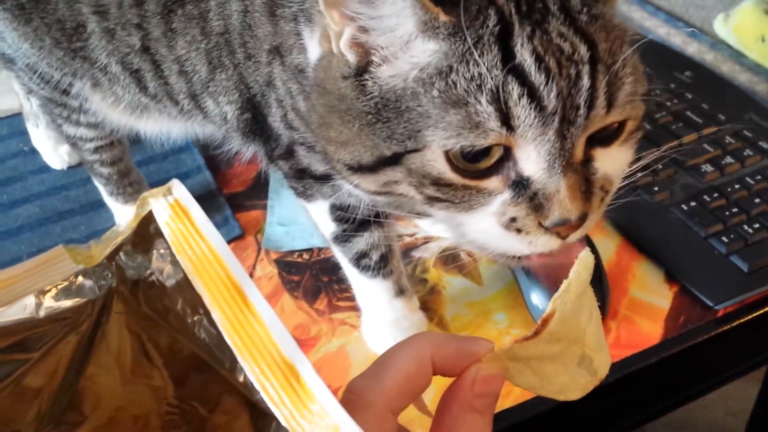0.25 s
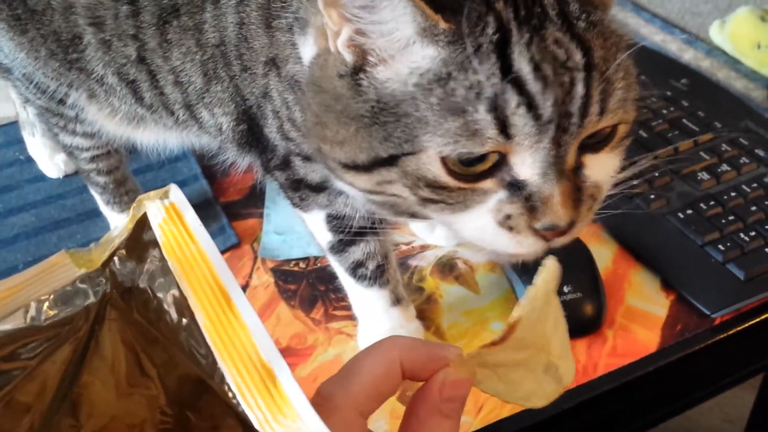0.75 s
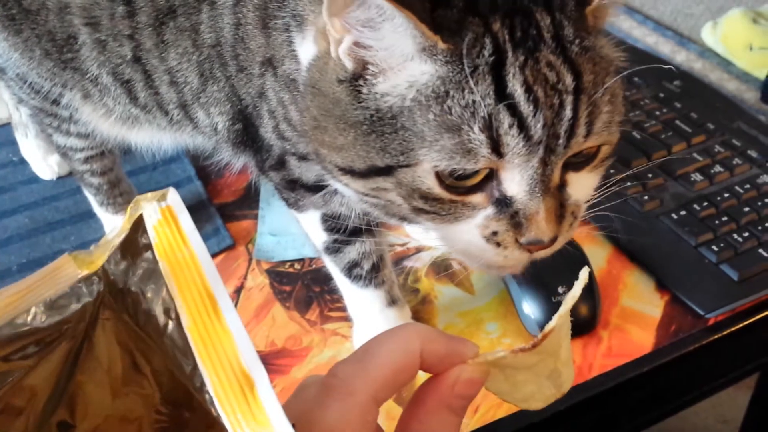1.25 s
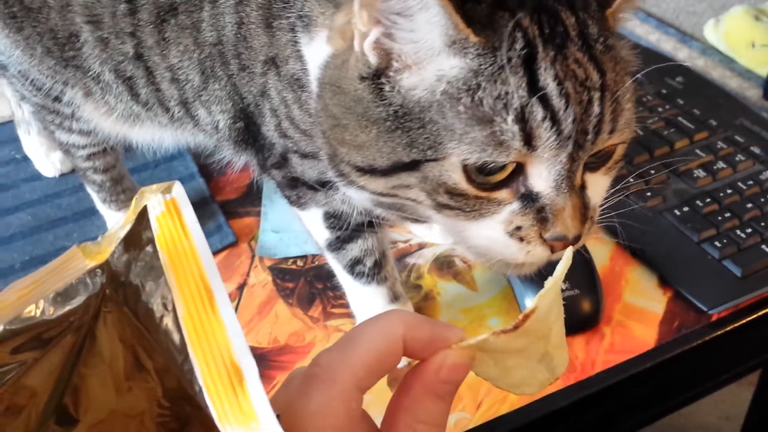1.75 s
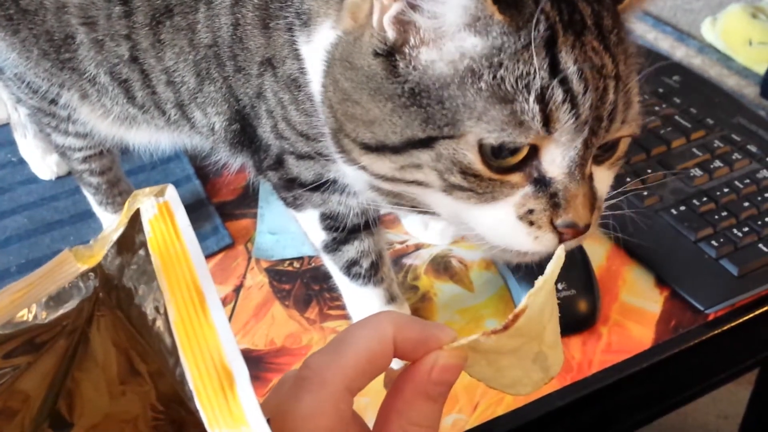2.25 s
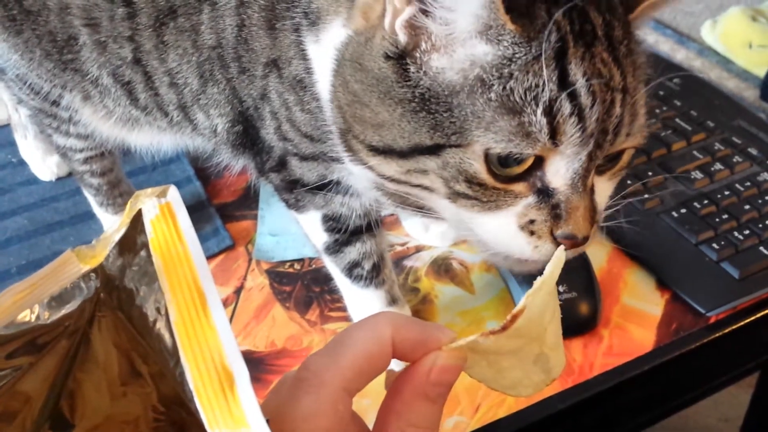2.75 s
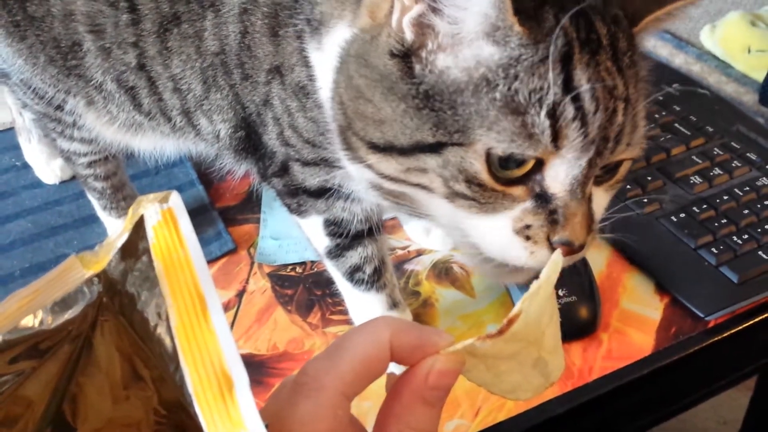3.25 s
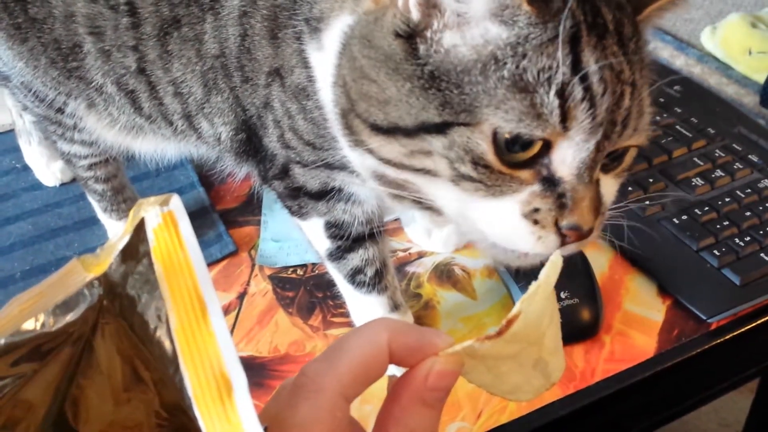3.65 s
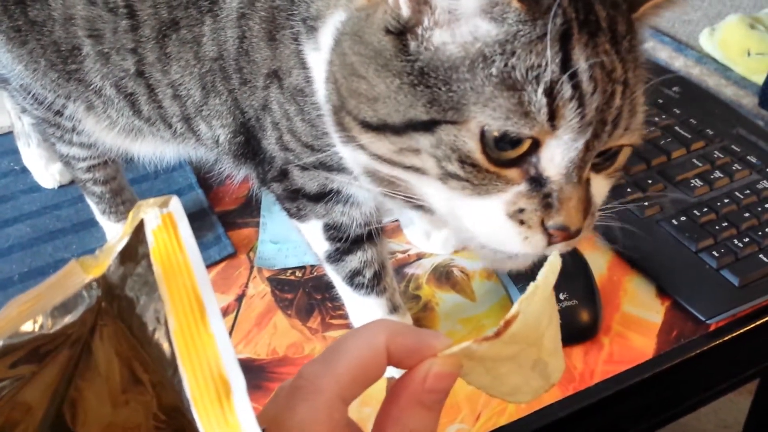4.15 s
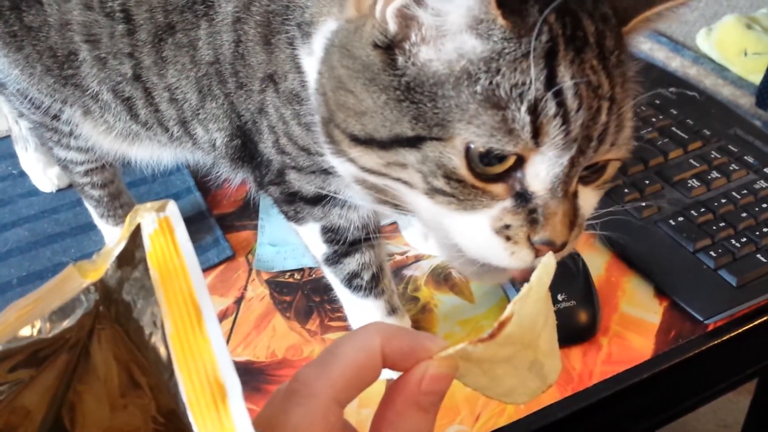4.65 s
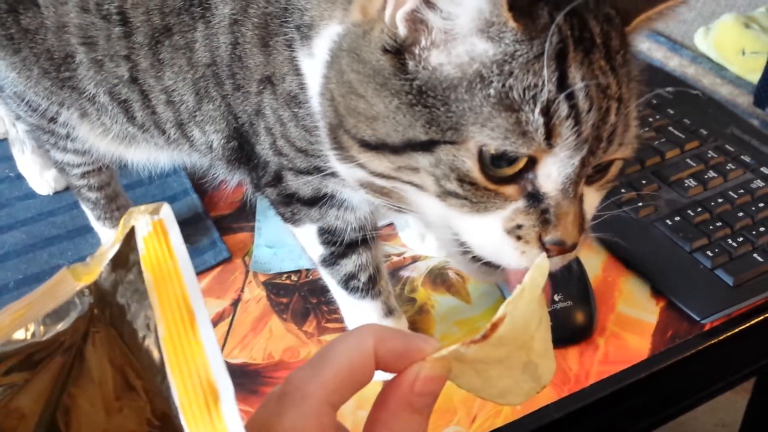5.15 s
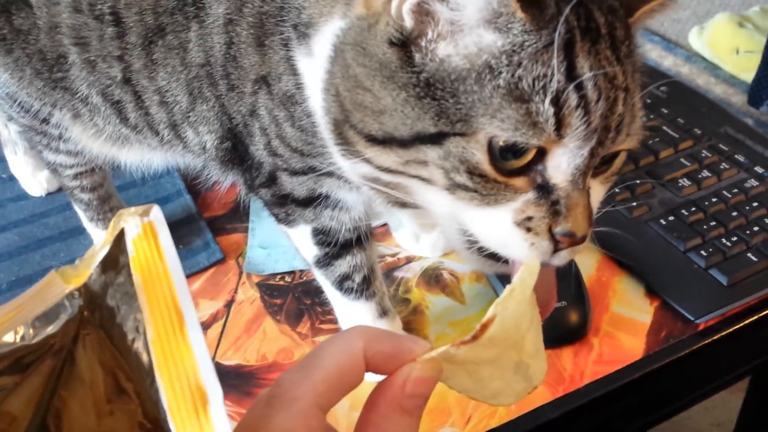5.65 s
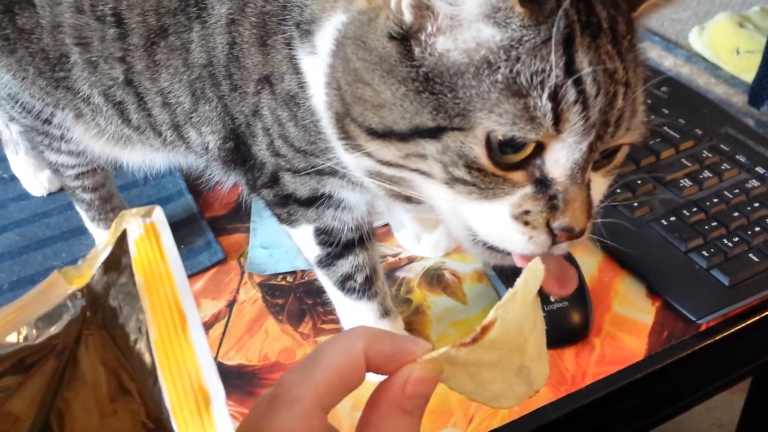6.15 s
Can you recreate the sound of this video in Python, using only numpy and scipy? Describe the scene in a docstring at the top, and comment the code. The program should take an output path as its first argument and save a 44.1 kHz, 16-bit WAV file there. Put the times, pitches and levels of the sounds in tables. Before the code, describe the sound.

A small quiet room, heard very close. A faint, slightly wavering low computer fan hum with soft air noise runs throughout. From 0 to 0.8 seconds come barely audible raspy licks and tiny brittle ticks. At 0.9 a wet click opens a longer, grainy drag of a cat's tongue over a potato crisp, fading by about 1.5. Bright little ticks come at 1.3 to 1.45, then at 1.52 to 1.56 a tight burst of wet smacks with a loud tongue clack and dull bumps. At 1.85 a short low saliva pop, then at 1.94 a sharp, bright crack with a brief hiss. Light licks continue; a wet click at 3.03, a soft bump at 3.6, a distinct clack at 3.89, another smack at 4.47. From 4.9 to 6.4 only faint rasps, a tiny scrape at 5.23, sparse ticks and weak clacks remain over the fan.

```python
"""A small room, heard close up: a cat licks a potato crisp.
Wet mouth clicks, crisp ticks and one crack are slip bursts ringing a bank of resonances.
Saliva pops are short gliding tones, tongue clacks damped pulses; a faint grainy hiss trails some clicks.
The rough tongue rasps as swelling grain noise, in short licks and one long drag.
Below: dull bumps and faint rustling of shaped noise, and a computer fan of air noise and unsteady tones."""
import sys
import numpy as np
from scipy import signal
from scipy.fft import rfft, irfft, next_fast_len
from scipy.io import wavfile
from scipy.ndimage import uniform_filter1d

SR = 44100
rng = np.random.default_rng(int(sys.argv[2]) if len(sys.argv) > 2 else 0)


def pcm_store(signal):
    """Save signal as 16-bit PCM."""
    levels = np.round(np.clip(np.atleast_2d(signal), -1, 1) * 32767)
    wavfile.write(sys.argv[1], SR, levels.astype(np.int16).T)


N = 282504
TIME = np.arange(N) / SR

# Resonances that colour the clicks, some strongly sided left or right. Each row: frequency in Hz and
# width in Hz before each contact's pitch and width factors, left-right balance in dB.
CLICK_MODES = [(520, 480, 0), (1240, 520, 4), (1780, 430, 9), (2620, 480, 4), (3450, 600, -1),
               (4650, 650, 7), (5750, 650, 12.5), (6800, 800, 3), (8700, 1400, -13), (12800, 3500, -11)]
# Stereo position of rasp, trailing hiss and rustle. Each row: frequency in Hz, left-right balance in dB.
RASP_PAN = [(900, 0.5), (1800, 5.5), (3800, -0.5), (5600, 12.5), (7200, 0), (9000, -8.5), (14000, -7)]

# long drag of the tongue: time of strongest contact, rise, fall
DRAG_AT_S, DRAG_RISE_S, DRAG_FALL_S = 0.94, 0.084, 0.28


def from_db(db):
    """Decibels to amplitude gain."""
    return 10 ** (np.asarray(db) / 20)


def rms_one(x):
    """Scale to an rms of 1."""
    return x / np.sqrt(np.mean(x ** 2) + 1e-20)


def at_hz(points, hz):
    """Interpolate a table on a log-frequency axis."""
    f, value = np.transpose(points)
    return np.interp(np.log(np.maximum(hz, 1)), np.log(f), value)


def panned(db):
    """Left and right gains of constant mean power."""
    gains = from_db(np.array([[.5], [-.5]]) * db)
    return gains / np.sqrt(np.mean(gains ** 2, axis=0))


def coloured(x, spectrum, pan=None):
    """Shape a noise by spectrum and optional balance, with a gentle 20 Hz low cut; rms 1."""
    size = next_fast_len(N)
    hz = np.arange(size // 2 + 1) * SR / size
    gain = from_db(at_hz(spectrum, hz)) * hz / np.hypot(hz, 20)
    if pan is not None:
        gain = gain * panned(at_hz(pan, hz))
    return rms_one(irfft(rfft(x, size) * gain, size)[..., :N])


def drift(knots_per_s):
    """Random values joined by straight lines; rms 1."""
    knots = rng.standard_normal(2000)
    return rms_one(np.interp(TIME * knots_per_s, np.arange(len(knots)), knots))


def swell(s, rise_s, fall_s):
    """Gaussian rise to 1 at time s, then Gaussian fall."""
    return np.exp(-.5 * ((TIME - s) / np.where(TIME < s, rise_s, fall_s)) ** 2)


def bandpass(x, low_hz, high_hz):
    """Butterworth band-pass, second order on each skirt."""
    return signal.sosfilt(signal.butter(2, [low_hz, high_hz], "band", fs=SR, output="sos"), x)


def resonate(x, hz, width_hz):
    """A resonance with steep skirts."""
    edge = np.hypot(hz, width_hz / 2)
    return bandpass(x, edge - width_hz / 2, edge + width_hz / 2)


def diffuse_noise():
    """White stereo noise, alike in both channels in the bass and independent in the treble."""
    # Likeness of the channels. Each row: frequency in Hz, likeness from 0 to 1.
    likeness = [(30, 0.8), (100, 0.87), (300, 0.98), (600, 0.47), (1200, 0.23), (3000, 0)]
    size = next_fast_len(N)
    mid, side = rfft(rng.standard_normal((2, size)))
    alike = at_hz(likeness, np.arange(len(mid)) * SR / size)
    stereo = np.sqrt(1 + alike) * mid + np.sqrt(1 - alike) * side * [[1], [-1]]
    return irfft(stereo, size)[:, :N]


def clicks():
    """Smacks, ticks and the crack: a sudden release and a dying flurry of uneven slips ring the modes."""
    crumble_per_s, build_share = 100, 0.19
    scatter = 0.71  # left-right independence of the slips
    grain_db, grain_s = 3, 0.000302
    out, size = np.zeros((2, N)), 1400
    age = np.arange(size) / SR
    window = .008 * SR  # mode levels are rms over 8 ms
    for s, length_s, levels_db, pitch, damping in contacts():
        start = round(s * SR)
        # all resonances share the same strong and weak moments
        grains = np.interp(age / grain_s, np.arange(size), rng.standard_normal(size))
        uneven = rms_one(from_db(grain_db * grains))
        envelope = np.minimum(age / (build_share * length_s), 1) * np.exp(-2 * age / length_s)
        for k, ((hz, width_hz, pan_db), db) in enumerate(zip(CLICK_MODES, levels_db)):
            shared = np.sqrt(1 - scatter ** 2) * rng.standard_normal(size)
            noise = shared + scatter * rng.standard_normal((2, size))
            # longer contacts crumble more
            slips = crumble_per_s * length_s * uneven * noise * envelope
            slips[:, 0] += 1  # the release
            ring = rms_one(resonate(slips, pitch * hz, damping * width_hz))
            sign = (-1) ** k  # neighbouring resonances swing in opposite senses
            gain = sign * panned(pan_db) * from_db(db) * np.sqrt(window / size)
            out[:, start:start + size] += gain * ring
    return out


def contacts():
    """All smacks, ticks and the crack: (s, length s, dB per resonance, pitch factor, width factor)."""
    # Wet mouth clicks. Each row: start in seconds, length in seconds, level in dB before the response
    # of the resonances, strongest at Hz, dB lost one octave away, pitch factor, mouth shape in Hz,
    # its boost or cut in dB, extra dB of the low jaw knock.
    smack_rows = [(0.9087, 0.0051, -44.5, 2350, 2.5, 0.97, 5200, 7, 2),
                  (0.9822, 0.0029, -57.5, 3300, 0, 0.95, 5000, 5, 0),
                  (1.079, .0025, -61, 1700, 3, 0.94, 1100, 0, 0),
                  (1.5192, 0.0032, -42.5, 2900, 2, 0.95, 1810, 3, 6),
                  (1.54, 0.0046, -39.5, 4200, 2, 1.0, 6500, 3, 7.5),
                  (1.5597, 0.003, -47.5, 3680, 2.5, 0.95, 5400, 5, 2),
                  (1.644, 0.0034, -62, 1300, 2, .95, 1300, -1, 2),
                  (1.9525, 0.0038, -45, 3200, 1.2, 1.0, 3450, 4, 2.5),
                  (2.745, 0.0029, -60.5, 1500, 12, 1.01, 1700, 2, 0),
                  (3.0257, 0.0028, -49.3, 2500, 0.5, 0.99, 1250, 2.5, -1),
                  (3.599, 0.0044, -59.5, 1500, 1, 0.93, 1630, 8.5, 5),
                  (4.47, 0.0029, -46.5, 2900, 3, 0.98, 1800, -12, 6.5)]
    # Light ticks of the crisp's edge. Each row: start in seconds, level in dB before the response
    # of the resonances, strongest at Hz, dB lost one octave away.
    tick_rows = [(0.4852, -63, 4200, 5), (0.6007, -55, 5490, 60), (0.7135, -58, 5500, 50),
                 (.755, -63, 6300, 30.5), (1.318, -53, 9300, 10), (1.3774, -54.5, 10800, 12),
                 (1.444, -53.5, 8500, 10), (1.5065, -60, 5500, 12), (1.6697, -61, 5430, 20),
                 (1.697, -60, 3440, 12), (2.199, -65, 6200, 12), (3.315, -60.5, 5600, 30),
                 (5.098, -66, 5400, 6), (5.5404, -60.5, 6800, 25), (5.5663, -58, 6100, 25),
                 (5.744, -58.5, 4600, 3.5), (6.002, -57.5, 5730, 25), (6.0417, -63.5, 5600, 25),
                 (6.3233, -64.5, 6800, 12)]
    tick_s, tick_pitch = 0.0035, 0.98
    # Crack of the crisp. One column: level in dB of each resonance.
    snap_db = [-63, -46.5, -32, -38, -42, -37, -20.5, -47, -26, -38.5]
    snap_at_s, snap_s, snap_pitch, snap_damping = 1.9438, 0.0011, 1.007, 1.2

    jaw = np.arange(len(CLICK_MODES)) == 0  # lowest resonance only
    events = []
    for s, length_s, db, hz, focus_db, pitch, mouth_hz, mouth_db, jaw_db in smack_rows:
        levels_db = mode_levels(db, hz, focus_db, pitch)
        levels_db = levels_db + mouth_shape(mouth_hz, mouth_db, pitch) + jaw_db * jaw
        events.append((s, length_s, levels_db, pitch, 1))
    for s, db, hz, focus_db in tick_rows:
        events.append((s, tick_s, mode_levels(db, hz, focus_db, tick_pitch), tick_pitch, 1))
    events.append((snap_at_s, snap_s, snap_db, snap_pitch, snap_damping))
    return events


def mode_levels(db, centre_hz, focus_db, pitch):
    """Excitation of each resonance in dB; loss grows with the square of its distance in octaves."""
    # Readiness of the resonances. One column: response of each in dB.
    response_db = [0.5, 1.5, -1.5, 1.5, -2.5, -1, 1, -4.5, -2.5, -9.5]
    octaves = np.log2(pitch * np.array(CLICK_MODES)[:, 0] / centre_hz)
    return db + np.array(response_db) - focus_db * octaves ** 2


def mouth_shape(hz, db, pitch, reach_octaves=0.14):
    """The shape of the mouth lifts or damps resonances near one frequency (dB)."""
    octaves = np.log2(pitch * np.array(CLICK_MODES)[:, 0] / hz)
    return db * np.exp(-.5 * (octaves / reach_octaves) ** 2)


def afterring(x, hz=5500, width_hz=450, level_db=-11, delay_s=0.000782):
    """A narrow treble resonance lingers briefly after each click."""
    lag = round(delay_s * SR)
    return from_db(level_db) * np.pad(resonate(x, hz, width_hz), ((0, 0), (lag, 0)))[:, :N]


def rasp():
    """Tongue on crisp: short licks, and one long drag with denser grains and a slightly unsteady level."""
    # Short licks. Each row: strongest contact in seconds, level there in dB.
    lick_rows = [(.16, -65.5), (.32, -69), (.62, -63), (.73, -58.5), (1.51, -60), (1.70, -66), (2.19, -62),
                 (2.65, -66), (3.08, -61), (3.59, -62), (3.78, -66), (4.02, -65.5), (4.21, -69),
                 (4.92, -65.5), (5.11, -67), (5.36, -62.5), (5.83, -62), (6.25, -67.5)]
    # Colour of the licks. Each row: frequency in Hz, relative density in dB per Hz.
    lick_colour = [(300, -14), (900, -9), (1700, -5), (2600, -11), (3900, -16), (4800, -8), (5600, 0),
                   (6400, -2), (7400, -9), (9500, -14), (15000, -18)]
    # Colour of the drag, strongest in a narrow band near 5.5 kHz. Each row: frequency in Hz,
    # relative density in dB per Hz.
    drag_colour = [(300, -14), (900, -8), (1700, -8.5), (2600, -10.5), (3900, -12), (4900, -3), (5500, 0.5),
                   (6200, -4.5), (6900, -4), (8000, -8.5), (9500, -13), (15000, -17)]
    lick_rise_s, lick_fall_s = 0.029, 0.024
    drag_db, unsteady_db, unsteady_per_s = -55.5, 1.1, 70

    lick_power = sum((from_db(db) * swell(s, lick_rise_s, lick_fall_s)) ** 2 for s, db in lick_rows)
    licks = np.sqrt(lick_power) * coloured(barbs(per_s=600, spread_db=3.7, rub=.15), lick_colour, RASP_PAN)
    drag_level = from_db(drag_db + unsteady_db * drift(unsteady_per_s))
    drag_level = drag_level * swell(DRAG_AT_S, DRAG_RISE_S, DRAG_FALL_S)
    drag = drag_level * coloured(barbs(per_s=700, spread_db=3.3, rub=0.16), drag_colour, RASP_PAN)
    return licks + drag


def barbs(per_s, spread_db, rub):
    """Dense random grains of uneven size over a soft noise rub."""
    sizes = from_db(spread_db * np.minimum(rng.exponential(1, N), 4)) * rng.choice([-1, 1], (2, N))
    return sizes * (rng.random(N) < per_s / SR) + rub * rng.standard_normal((2, N))


def pops(pan_db=4, glide_per_s=10, linger=1.25, rough_db=0.5, wobble_rad=.3):
    """Films of saliva part: a few smooth cycles, unsteady and rising a little in pitch."""
    # Saliva pops. Each row: peak in seconds, frequency at the peak in Hz, rise in seconds,
    # nominal peak in dB.
    pop_rows = [(1.851, 930, .0022, -42), (1.8505, 720, .0014, -52), (1.865, 1080, .0008, -46),
                (1.8654, 1700, .0015, -48), (1.8642, 2950, .0009, -57)]
    out = 0
    for s, hz, rise_s, db in pop_rows:
        age = TIME - s
        flutter = wobble_rad * rms_one(uniform_filter1d(rng.standard_normal(N), size=40))
        phase = 2 * np.pi * hz * age * (1 + glide_per_s * age / 2) + flutter
        level = from_db(db + rough_db * drift(300)) * swell(s, rise_s, linger * rise_s)
        out = out + level * np.cos(phase)
    return panned(pan_db) * out


def clacks(pan_db=4, rise_s=0.0018, fall_s=0.0028, slips=0.015):
    """The tongue comes unstuck: one heavily damped pulse amid a few tiny slips."""
    # Dry tongue clacks. Each row: time in seconds, frequency in Hz, width in Hz, peak in dB before panning.
    clack_rows = [(.5038, 3350, 900, -46.5), (1.5198, 2750, 1100, -26.5), (3.8851, 2500, 1300, -33),
                  (5.099, 2650, 700, -51), (5.1105, 2700, 1000, -51), (6.004, 2700, 900, -50)]
    out = 0
    for s, hz, width_hz, db in clack_rows:
        push = slips * swell(s, rise_s, fall_s) * rng.standard_normal(N) + 1e-18
        push[round(s * SR)] += 1
        ring = resonate(push, hz, width_hz)
        out = out + from_db(db) * ring / np.abs(ring).max()
    return panned(pan_db) * out


def trailing_hiss():
    """A faint grainy hiss trails some clicks and dies away exponentially."""
    # Hiss trails. Each row: start in seconds, initial level in dB, decay constant in seconds.
    trail_rows = [(1.544, -57, .015), (1.563, -54, .025), (1.954, -48.5, 0.045), (3.034, -57, .028)]
    # Colour of the hiss. Each row: frequency in Hz, relative density in dB per Hz.
    trail_colour = [(400, -6), (900, -4), (1300, -3.5), (2500, -4.5), (3500, 0), (4600, 1), (5600, -3),
                    (7000, -7), (9000, -6), (15000, -17)]
    level = 0
    for s, db, dying_s in trail_rows:
        level = level + from_db(db) * (TIME > s) * np.exp(-np.abs(TIME - s) / dying_s)
    return level * coloured(barbs(per_s=700, spread_db=3.5, rub=.08), trail_colour, RASP_PAN)


def off_centre(x, left_lag_s=.00016):
    """The mouth is a little nearer to the right microphone, so the left lags."""
    return np.array([np.interp(TIME - left_lag_s, TIME, x[0]), x[1]])


def room(x):
    """A dull cluster of nearby reflections and a diffuse tail whose decay depends on frequency."""
    # Decay. Each row: frequency in Hz, t60 in seconds.
    t60_s = [(200, 0.38), (1500, 0.24), (3500, 0.23), (5500, 0.39), (9000, 0.16), (14000, 0.15)]
    # Colour of the tail. Each row: frequency in Hz, gain in dB.
    tail_colour = [(300, -10), (1000, 5.5), (1700, 3), (2700, 2), (3500, 0), (4600, 3), (5400, 2.5),
                   (6100, -5.5), (7200, 3), (8900, -4.5), (11000, 6), (14000, 2.5)]
    # Balance of the tail. Each row: frequency in Hz, left-right balance in dB.
    tail_pan = [(800, -16), (1600, 5), (4000, -0.5), (5600, 11), (7200, -6), (9000, -15), (14000, -9)]
    tail_db, first_s = -15, .008
    echo_db, smear_s, echo_cut_hz = -23, .002, 4500  # echo level is before the low-pass

    age, edges_hz = TIME[:SR // 2], np.geomspace(100, 17000, 9)
    tail = 0
    for low, high in zip(edges_hz, edges_hz[1:]):
        band = bandpass(rng.standard_normal((2, len(age))), low, high)
        tail = tail + band * np.exp(-np.log(1000) * age / at_hz(t60_s, np.sqrt(low * high)))
    build_up = np.minimum(age / first_s, 1) ** 2
    tail = coloured(tail * build_up, tail_colour, tail_pan)[:, :len(age)]
    tail = from_db(tail_db) * rms_one(tail) / np.sqrt(len(age))

    cluster = rng.standard_normal((2, len(age)))
    cluster = cluster * (age > first_s) * np.exp(-np.abs(age - first_s) / smear_s)
    cluster = from_db(echo_db) * rms_one(cluster) / np.sqrt(len(age))
    cluster = signal.sosfilt(signal.butter(1, echo_cut_hz, fs=SR, output="sos"), cluster)
    return signal.fftconvolve(x.mean(axis=0, keepdims=True), tail + cluster, axes=1)[:, :N]


def bumps(rise_s=0.00065, dying_s=0.031, drag_rumble_db=-56.5):
    """Soft contacts: low rumbles that die quickly, and a longer one under the drag of the tongue."""
    # Dull bumps. Each row: start in seconds, level in dB before the onset and decay.
    bump_rows = [(.905, -49.5), (1.52, -47), (1.541, -51), (1.558, -50), (1.846, -55), (1.952, -46),
                 (3.025, -53), (3.6, -47.5), (4.47, -55)]
    # Colour of the bumps. Each row: frequency in Hz, relative density in dB per Hz.
    bump_colour = [(30, -25), (70, -2), (160, -1.5), (400, -4), (650, -21.5), (1500, -41)]
    level = from_db(drag_rumble_db) * swell(DRAG_AT_S, DRAG_RISE_S, DRAG_FALL_S / 2)
    for s, db in bump_rows:
        age = np.maximum(TIME - s, 0)
        level = level + from_db(db) * (1 - np.exp(-age / rise_s)) * np.exp(-age / dying_s)
    return level * coloured(diffuse_noise(), bump_colour)


def rustle():
    """Faint rubbing noise, as of fur and fingers shifting, with one brief scrape."""
    # Rustle level. Each row: time in seconds, level in dB.
    rustle_level = [(0, -70), (.45, -83), (.7, -68.5), (1.3, -64.5), (1.7, -78), (2.5, -72), (2.8, -70),
                    (4.9, -76.5), (6.4, -66)]
    # Colour of the rustle. Each row: frequency in Hz, relative density in dB per Hz.
    rustle_colour = [(300, 8), (900, -4.5), (1800, 2.5), (3000, -5.5), (4200, -3.5), (6000, -29),
                     (9000, -17), (15000, -22.5)]
    scrape_at_s, scrape_rise_s, scrape_fall_s, scrape_db = 5.229, .006, .009, -58.5
    level = from_db(np.interp(TIME, *np.transpose(rustle_level)))
    level = level + from_db(scrape_db) * swell(scrape_at_s, scrape_rise_s, scrape_fall_s)
    return level * coloured(diffuse_noise(), rustle_colour, RASP_PAN)


def fan():
    """Air noise and unsteady motor and blade lines, rising and falling slightly together."""
    # Colour of the air noise. Each row: frequency in Hz, relative density in dB per Hz.
    air_colour = [(25, -37), (55, -15), (85, -7), (140, -3), (190, -4.5), (240, 0.5), (288, 4.5),
                  (320, -5.5), (380, -10), (500, -13.5), (1050, -15), (1400, -21.5), (1750, -21),
                  (3400, -25), (5200, -24.5), (6800, -22), (11000, -28), (16000, -30.5)]
    # Balance of the air noise. Each row: frequency in Hz, left-right balance in dB.
    air_pan = [(100, 0.5), (330, -1.5), (1200, 0), (2100, 4.5), (4000, -1), (5900, -1.5), (7000, -7.5),
               (8600, -7.5), (12000, -1.5)]
    # Motor and blade lines. Each row: frequency in Hz, rms in dB before the common swing.
    hum_rows = [(119.7, -64.5), (167, -70.5), (251.8, -66.5), (770, -79.5)]
    # Low drone that steers the common swing. Each row: time in seconds, level in dB.
    drone_level = [(0.0, -56.5), (2.19, -54), (2.55, -59.5), (3.01, -55.5), (4.89, -57.5), (5.05, -55.5),
                   (6.41, -55)]
    air_db = -55.0  # rms before the common swing
    waver, wander_rad = 0.18, 0.54  # wander is that of the lowest line
    follows = 0.48  # share of the drone's dB swing

    air = from_db(air_db) * coloured(diffuse_noise(), air_colour, air_pan)
    lines = 0
    for hz, db in hum_rows:
        amplitude = 1 + waver * drift(8)
        phase = 2 * np.pi * hz * TIME + wander_rad * hz / hum_rows[0][0] * drift(6)
        lines = lines + from_db(db) * rms_one(amplitude * np.sin(phase))
    drone_db = np.interp(TIME, *np.transpose(drone_level))
    return (air + lines) * from_db(follows * (drone_db - drone_db.mean()))


def scene():
    """The cat close by, its room, and the background."""
    contact_clicks, saliva = clicks(), pops()
    cat = contact_clicks + afterring(contact_clicks) + rasp()
    close = off_centre(cat) + saliva + clacks() + trailing_hiss()
    return close + room(cat + saliva) + rustle() + bumps() + fan()


def record(dry, cutoff_hz=15900):
    """Clip at full scale, then a steep elliptic low-pass."""
    low_pass = signal.ellip(10, .2, 70, cutoff_hz, fs=SR, output="sos")
    return signal.sosfilt(low_pass, np.clip(dry, -1, 1))


dry = scene()
out = record(dry)
pcm_store(out)
```